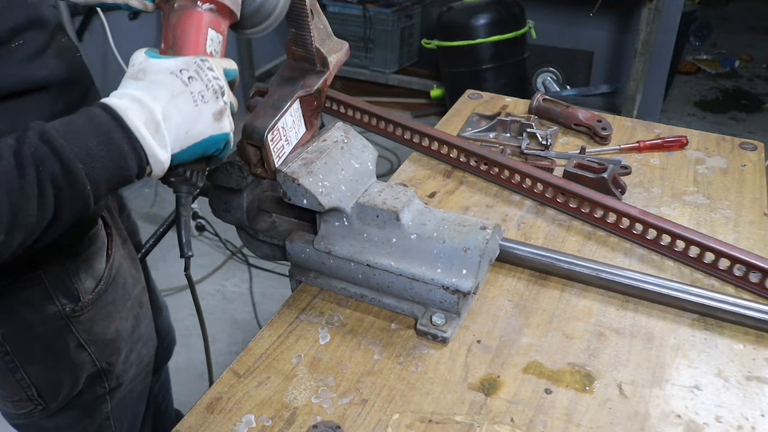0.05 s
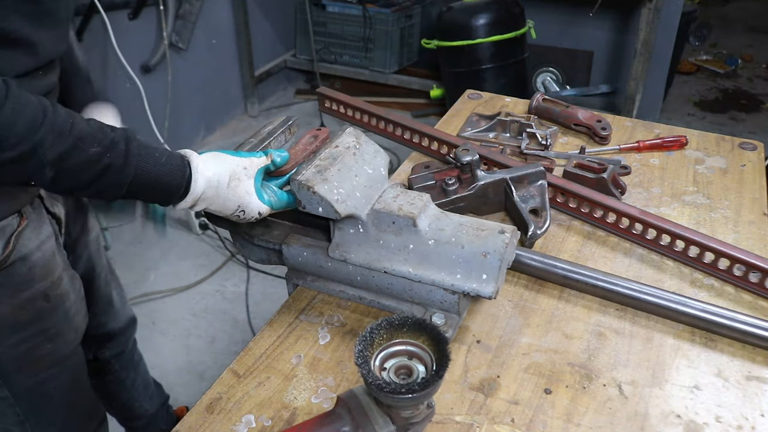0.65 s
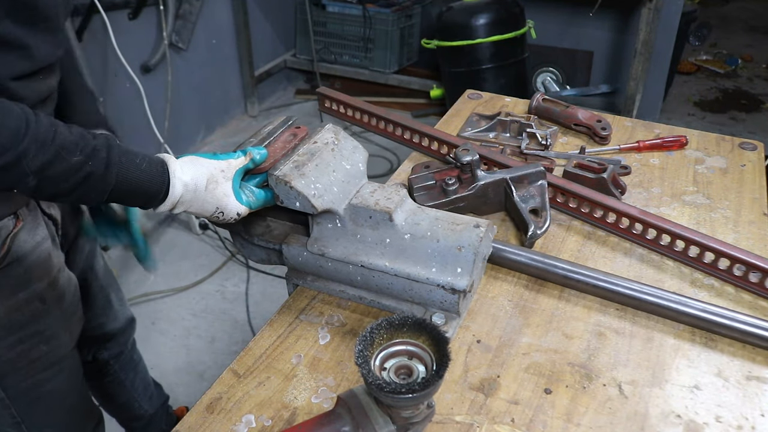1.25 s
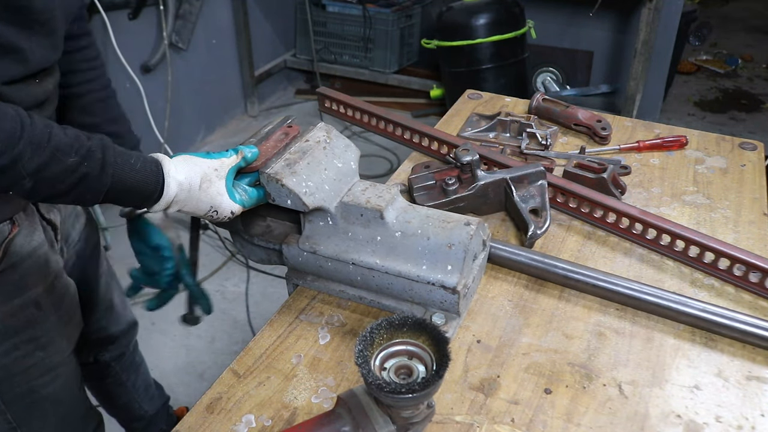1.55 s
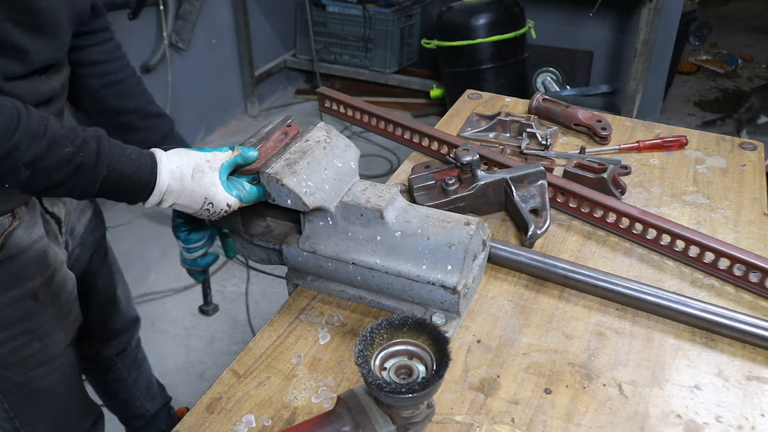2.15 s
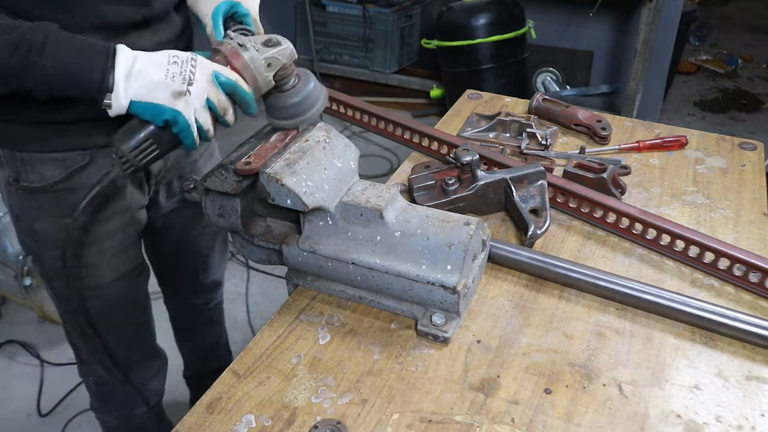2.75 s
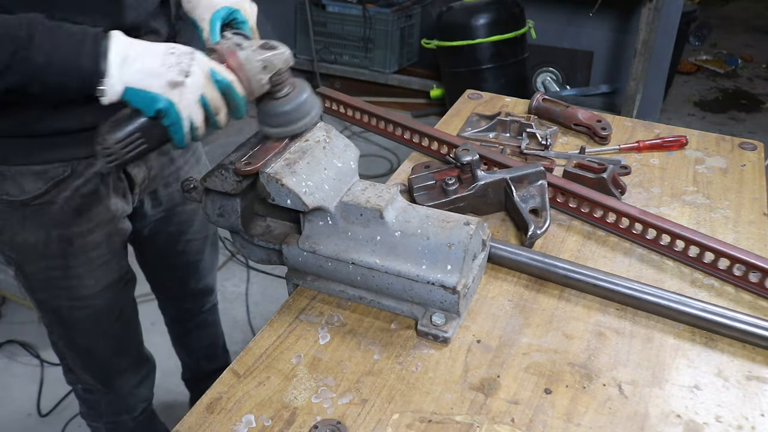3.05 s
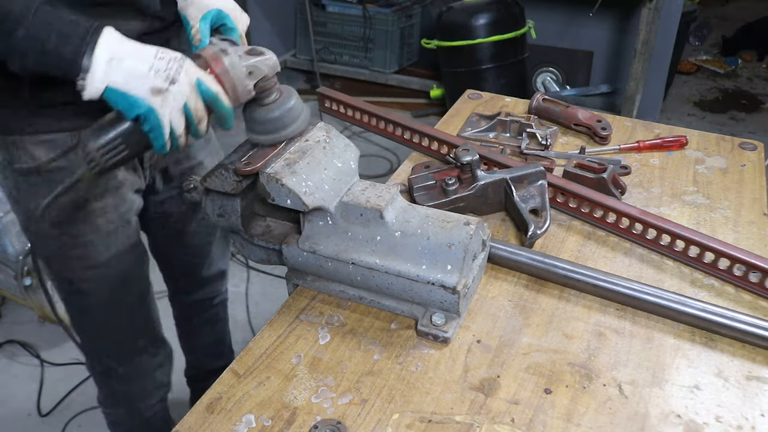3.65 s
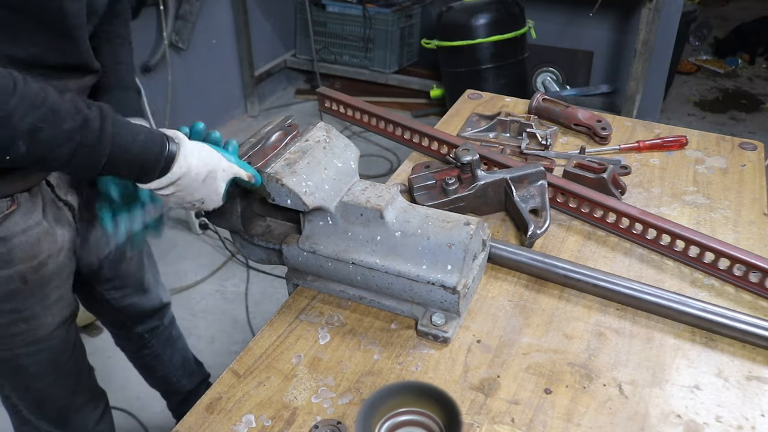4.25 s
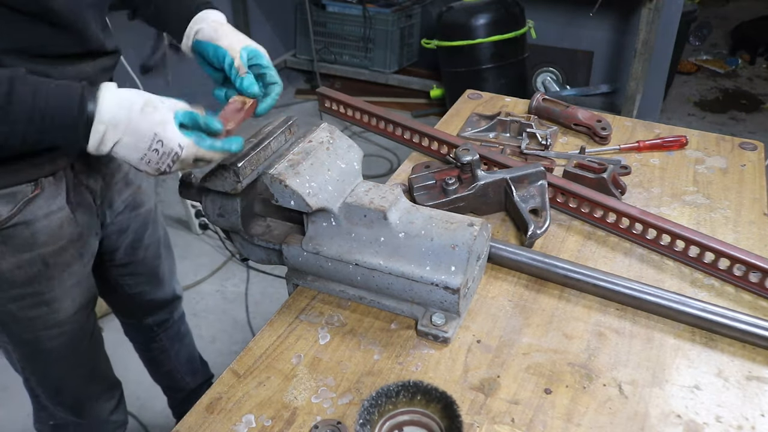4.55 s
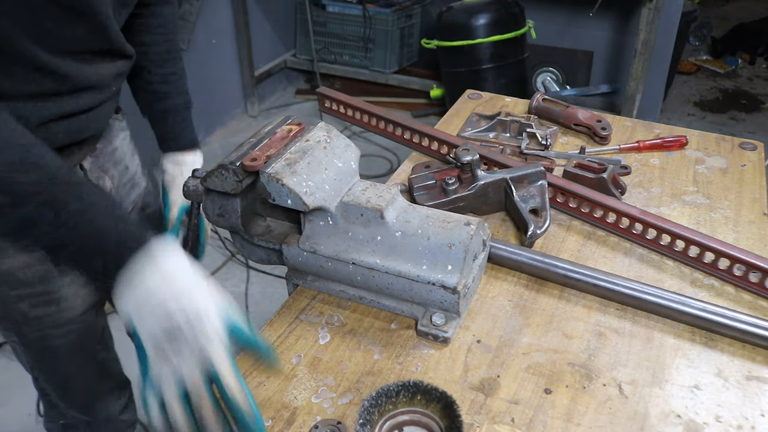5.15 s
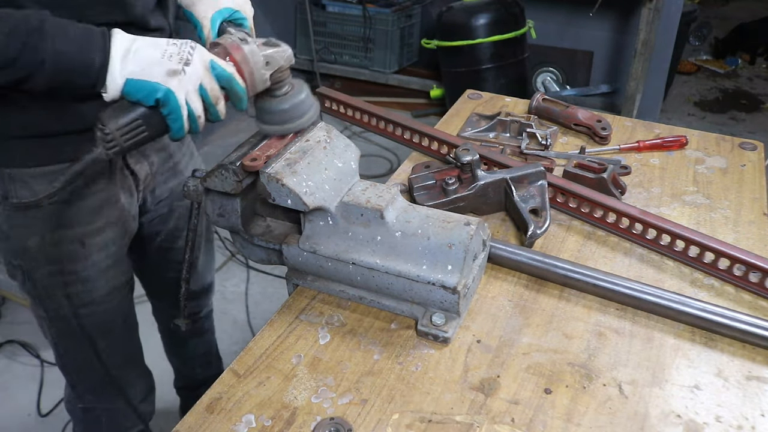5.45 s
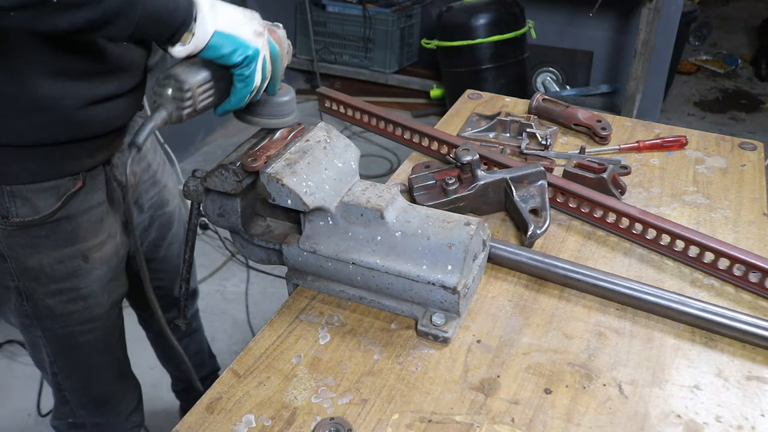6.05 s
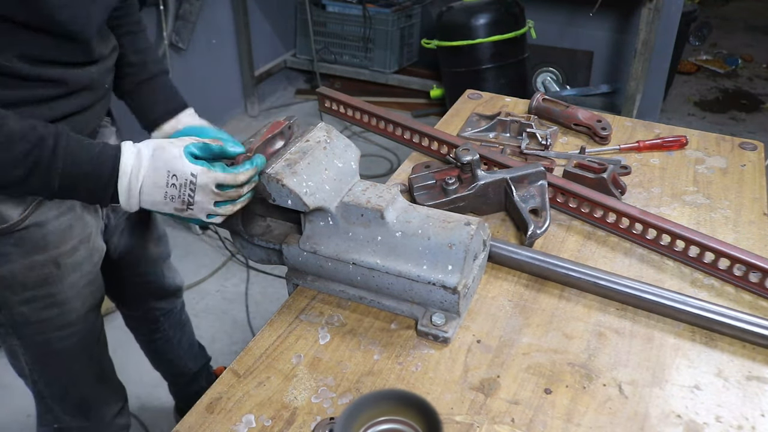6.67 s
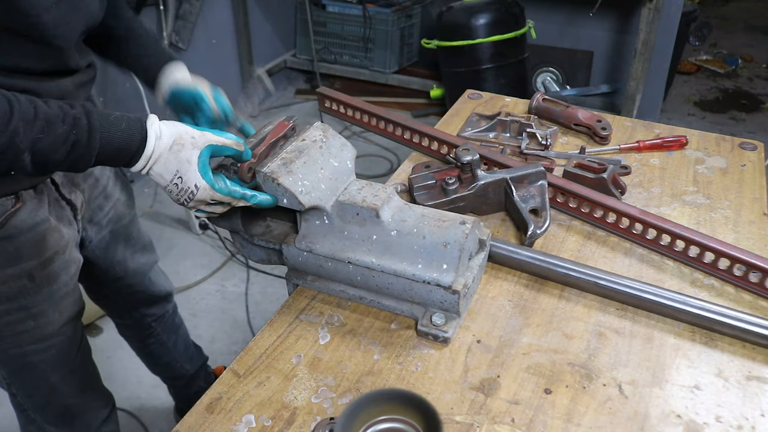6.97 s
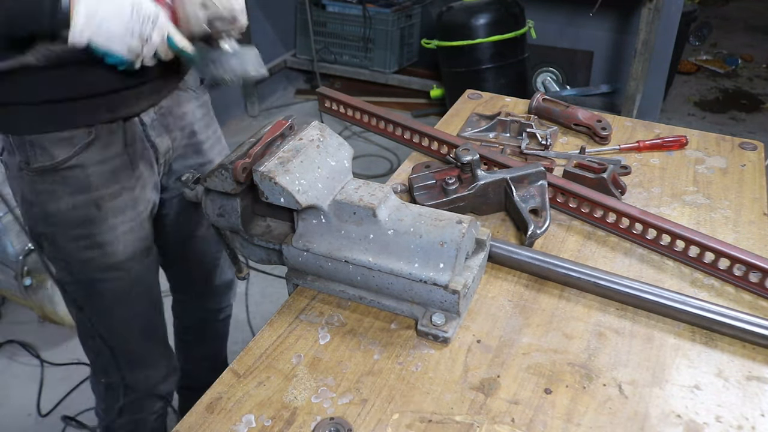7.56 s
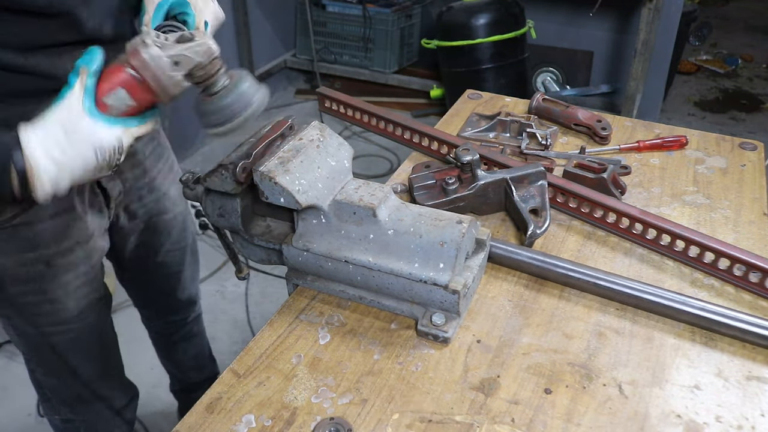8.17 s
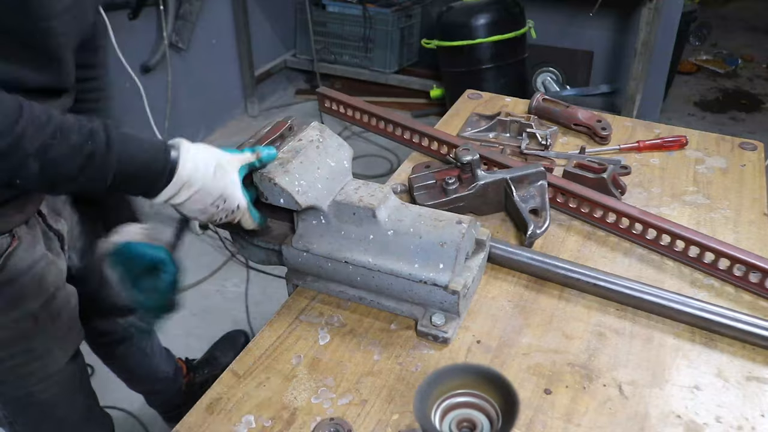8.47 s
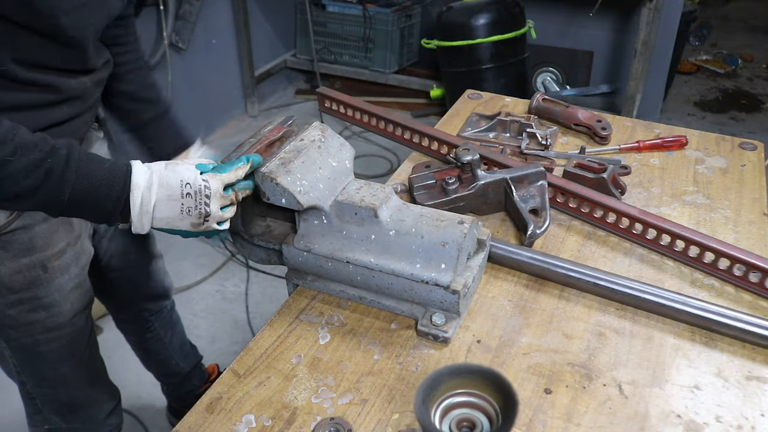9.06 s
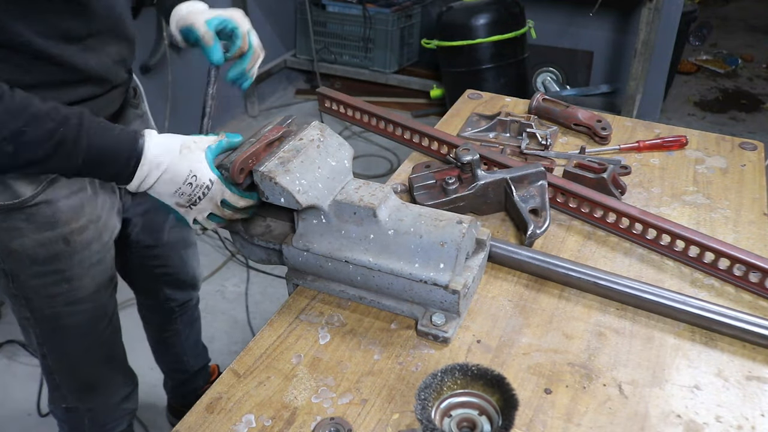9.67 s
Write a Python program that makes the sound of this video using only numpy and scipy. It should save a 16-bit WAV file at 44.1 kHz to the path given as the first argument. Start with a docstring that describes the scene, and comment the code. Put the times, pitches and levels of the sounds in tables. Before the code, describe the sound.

An angle grinder's wire brush scours steel in short whining bursts, rattling down on a wooden bench between metal clinks.

```python
"""An angle grinder with a wire cup brush scours rusty steel in a vise, in four short bursts. Hum, gear whine,
wire hiss and commutator sparking follow the motor speed. The first burst is already under way and its sound
stops abruptly at 0.18 s; after the others the tool coasts on the wooden bench and rattles the top until it
stops. In between, gloved hands work the vise, turn the part and drag the grinder up again. Small workshop."""
import sys
import numpy as np
from scipy import signal
from scipy.fft import rfft, irfft
from scipy.io import wavfile
from scipy.ndimage import uniform_filter1d

SR = 44100
rng = np.random.default_rng(int(sys.argv[2]) if len(sys.argv) > 2 else 0)


def dump(signal):
    """Clip the signal to [-1, 1] and save it as 16-bit WAV at the path in sys.argv[1]."""
    limited = np.clip(np.atleast_2d(signal).T, -1, 1)
    pcm = np.round(limited * 32767).astype(np.int16)
    wavfile.write(sys.argv[1], SR, pcm)


N = 432621
TIME = np.arange(N) / SR
TOP_HZ = 15750
FIRST_ENDS_S = 0.182

# Bursts 2-4. Each row: switch-on in s, laid on the bench in s, standstill in s, bearing friction in Hz/s.
BURSTS = [(2.665, 3.884, 4.535, 358), (5.354, 6.38, 7.2, 366), (7.685, 8.422, 9.176, 400)]
# Brush load, one list per burst. Each row: time in s, motor speed in Hz, whine in dB, hiss in dB.
LOAD_CURVES = [
    [(0, 562, -48, -34.5), (.04, 496, -56, -34.5), (.12, 556, -52, -32.5), (.18, 532, -56, -35.5)],
    [(2.74, 525, -47.5, -35), (2.86, 490, -49.5, -37), (3.05, 524, -58, -34), (3.26, 574, -59, -35.5),
     (3.42, 512, -67, -36), (3.56, 558, -74, -33), (3.62, 492.3, -56, -35), (3.72, 330.3, -50, -33.5)],
    [(5.45, 551, -54, -33.5), (5.53, 569, -52, -37), (5.75, 574, -68, -36.5), (5.87, 594, -55, -36),
     (6.11, 604, -57, -35), (6.2, 507.3, -51, -37)],
    [(7.8, 550, -67, -33.5), (7.9, 558, -68, -36), (7.98, 524, -59, -35.5), (8.1, 555, -51.5, -37.5),
     (8.18, 566.4, -51.5, -38)],
]
# Broad responses of bench and vise. Each row: frequency in Hz, level in dB.
BENCH_SPECTRUM = [(50, -72), (110, -76), (250, -36.5), (380, -53.5), (470, -23.5), (750, -25),
                  (1100, -14.5), (1850, -11.5), (2600, -9.5), (3800, -13.5), (4600, -13), (7000, -16.5),
                  (10000, -34), (16000, -22.5)]
VISE_SPECTRUM = [(50, -43), (110, -34), (220, -17.5), (370, -22.5), (520, -8), (700, -14.5), (1100, -1),
                 (1700, -5), (5000, -12.5), (6200, -19.5), (9000, -28.5), (16000, -51)]
# Their resonances. Each row: frequency in Hz, width in Hz, level in dB.
BENCH_MODES = [(925, 18, -2.5), (1256, 75, -6.5), (1429, 79, 1), (1620, 110, -1.5), (1704, 33, -2),
               (1820, 28, -4), (1983, 37, 7), (2116, 30, 5.5), (2178, 69, 6.5), (2278, 45, 2.5),
               (2393, 27, 3), (2852, 64, 7), (2740, 41, -6), (3135, 49, 1), (3348, 69, 5.5),
               (3560, 220, -4), (3975, 55, -1)]
VISE_MODES = [(456, 29, 1), (761, 13, 7), (935, 19, 9), (1020, 42, 3), (1225, 93, 7), (1420, 25, 6),
              (1990, 28, 6), (2184, 105, 6.5), (1570, 27, -4), (560, 57, -9.5), (2860, 120, 1.5),
              (3580, 320, -5), (3850, 66, -24), (4480, 560, -9), (10700, 350, -21.5), (13400, 640, -31)]


def undb(db):
    """Decibels to gain."""
    return 10 ** (np.asarray(db) / 20)


def unit(x):
    """Scale to rms 1."""
    return x / np.sqrt(np.mean(x ** 2) + 1e-20)


def butter(x, hz, kind="low", order=2):
    """Butterworth filter."""
    return signal.sosfilt(signal.butter(order, hz, kind, fs=SR, output="sos"), x)


def walk(hz):
    """Random drift of rms 1, up to the given rate."""
    return unit(butter(rng.standard_normal(N), hz))


def through(x, impulse):
    """Convolve, keeping the length."""
    return signal.oaconvolve(x, impulse)[:len(x)]


def resonate(x, spectrum, modes=()):
    """Minimum-phase filter: a broad spectrum with resonances on top."""
    hz = np.maximum(np.fft.rfftfreq(4096, 1 / SR), 1)
    points_hz, points_db = np.transpose(spectrum)
    power = undb(np.interp(np.log(hz), np.log(points_hz), points_db)) ** 2
    for centre_hz, width_hz, db in modes:
        power += undb(db) ** 2 / (1 + 2 * ((hz - centre_hz) / width_hz) ** 2) ** 2
    cepstrum = irfft(np.log(power) / 2)
    cepstrum[1:len(hz) - 1] *= 2
    cepstrum[len(hz):] = 0
    return through(x, irfft(np.exp(rfft(cepstrum))))


def grains(per_s, spread_db):
    """Random tiny impacts of uneven size."""
    size = undb(spread_db * np.minimum(rng.exponential(size=N), 4))
    return unit((rng.random(N) < per_s / SR) * size * rng.standard_normal(N))


def gate(start_s, end_s, attack_s, release_s):
    """Trapezoid envelope, zero again at end_s."""
    return np.clip(np.minimum((TIME - start_s) / attack_s, (end_s - TIME) / release_s), 0, 1)


def strokes(rows, attack_s, release_s):
    """Envelope of hand movements: each swells, holds and eases off."""
    return sum(undb(db) * gate(s, s + length_s, attack_s, release_s) for s, length_s, db in rows)


def blows(rows, spectrum, modes, crack_s, scrape_s, trim_db, rebound_db=-9, rebound_s=0.01, detune=0.005):
    """Crack, gritty scrape and rebound; the place of contact sets brightness and which modes ring."""
    count, head, scatter_db = 5000, 530, 2.5
    t = np.arange(count) / SR
    out = np.zeros(N + count)
    for s, level_db, db_per_octave, share in rows:
        noise, grit, pull, place = rng.standard_normal((4, count))
        crack = unit((np.tanh(noise) + 2 * (t == 0)) * np.exp(-t / crack_s))
        build = 1 - np.exp(-t / (1e-5 + 0.0057 * (1 - share) ** 4))  # slower without a hard crack
        again_s = t - rebound_s * (0.5 + rng.random())
        rebound = undb(rebound_db) * (again_s > 0) * np.exp(-np.abs(again_s) / scrape_s)
        scrape = unit(grit * np.abs(noise) * (build * np.exp(-t / scrape_s) + rebound))
        tilt_db = lambda hz: db_per_octave * np.log2(max(hz, 700))
        body = [(hz, db + tilt_db(hz)) for hz, db in spectrum]
        struck = [(hz * (1 + detune * a), width_hz, db + tilt_db(hz) + scatter_db * b)
                  for (hz, width_hz, db), a, b in zip(modes, pull, place)]
        ring = resonate(np.sqrt(share) * crack + np.sqrt(1 - share) * scrape, body, struck)
        start = int(s * SR)
        out[start:start + count] += ring * undb(level_db + trim_db) / np.std(ring[:head])
    return out[:N]


def stick_slip(rows, trim_db, rough, sag, overtone_db):
    """Brief rough tones that swell and die; sag lowers the pitch as they go."""
    out, unrest = np.zeros(N), 1 + rough * walk(400)
    for s, db, hz, rise_s in rows:
        part = slice(int(s * SR), int(s * SR) + SR // 10)
        age = np.maximum(TIME[part] - s, 0) / rise_s
        phase = 2 * np.pi * np.cumsum(hz * unrest[part] * np.exp(-sag * (age - 1))) / SR
        tone = sum(undb(overtone_db * (k - 1)) * np.sin(k * phase)
                   for k in (1, 2, 3) if k * hz < TOP_HZ / 2 or k == 1)
        out[part] += undb(db + trim_db) * (age * np.exp(1 - age)) ** 2 * tone
    return out


def shimmer(rows, modes, flare_db, flare_hz, base_db):
    """Sliding steel: fine slips keep a few modes ringing, each flaring on its own."""
    base = [(200, base_db - 32), (2000, base_db), (16000, base_db - 9)]
    ring = sum(resonate(grains(6000, 1.0) * undb(flare_db * walk(flare_hz)), base, [mode])
               for mode in modes)
    return unit(ring) * strokes(rows, attack_s=0.0074, release_s=0.02)


def room_tone():
    """Faint steady noise."""
    # Each row: frequency in Hz, level in dB.
    spectrum = [(30, -22), (140, -9.5), (400, -5.5), (950, 11.5), (2000, 2), (6000, 3.5), (16000, -1.5)]
    return undb(-64.5) * unit(resonate(rng.standard_normal(N), spectrum))


def workshop(x, t60_s, wet_db, damp_hz):
    """Add dense, dull reflections from the bench top and cluttered walls."""
    t = np.arange(SR // 2) / SR
    tail = rng.standard_normal(len(t)) * np.exp(-np.log(1000) * t / t60_s) * (t > 0.004)
    tail = butter(tail, damp_hz, order=1)
    return x + undb(wet_db) * through(x, tail / np.linalg.norm(tail))


def cloth_rustle():
    """Gloves and sleeves brush past."""
    # Each row: start in s, length in s, level in dB.
    moves = [(0.2, 0.69, -62.5), (0.98, 0.57, -67), (1.7, 0.93, -68), (2.3, 0.46, -65),
             (2.612, 0.047, -42.5), (4.7, 0.29, -54), (5.25, 0.14, -55.5), (7.38, 0.3, -58),
             (9.2, 0.26, -61.5), (9.62, 0.16, -42)]
    # Each row: frequency in Hz, level in dB.
    spectrum = [(40, -44), (200, -30), (1500, -13), (4000, -7), (8000, -3), (11000, -10), (16000, -9)]
    friction = grains(per_s=6000, spread_db=1.0) * undb(4.7 * walk(33))
    return unit(resonate(friction, spectrum)) * strokes(moves, attack_s=0.0029, release_s=0.034)


def steel_rubs():
    """Dry steel sticks and slips, ringing now one set of vise modes, now the other."""
    # Screw turns, part shifts and tool drags. Each row: start in s, length in s, level in dB.
    moves = [(0.2, 0.18, -52), (0.32, 0.496, -47.5), (0.78, 0.17, -51), (0.955, 0.35, -55.5),
             (1.25, 0.393, -57), (1.69, 0.087, -44), (1.76, 0.4, -59.5), (2.1, 0.24, -54.5),
             (2.3, 0.23, -60), (2.44, 0.21, -61.5), (4.68, 0.33, -53.5), (5.02, 0.18, -56.5),
             (5.195, 0.039, -40), (7.32, 0.11, -56.5), (7.385, 0.24, -41.5), (9.19, 0.3, -55),
             (9.48, 0.2, -54.5), (9.615, 0.22, -46)]
    catching = undb(2.4 * walk(32))
    ring = 0
    for modes in (VISE_MODES[::2], VISE_MODES[1::2]):
        slips = grains(per_s=2000, spread_db=2.8) * catching * undb(3.5 * walk(18.4))
        ring += resonate(slips, VISE_SPECTRUM, modes)
    return unit(ring) * strokes(moves, attack_s=0.0079, release_s=0.071)


def steel_squeaks():
    """Dry steel slips with a short squeak."""
    # Each row: start in s, level in dB, pitch in Hz, rise in s.
    slips = [(0.329, -21, 3730, 0.0015), (0.559, -30.5, 4740, 0.0023), (0.683, -31, 4750, 0.002),
             (0.7305, -26, 5000, 0.0016), (0.759, -46, 1250, 0.0029), (1.752, -35, 6300, 0.0043),
             (4.7122, -19.5, 2324, 0.0021), (4.807, -26, 1600, 0.0045), (7.398, -28, 1300, 0.0043),
             (7.606, -46, 1350, 0.013), (9.767, -35, 3950, 0.0031), (9.784, -30, 3920, .0025)]
    return stick_slip(slips, trim_db=-4, rough=0.052, sag=0.025, overtone_db=-10.5)


def screw_thread():
    """The thread shimmers as the vise screw is wound in."""
    # Each row: start in s, length in s, level in dB.
    turns = [(0.24, 0.62, -53), (0.96, 0.62, -59)]
    # Each row: frequency in Hz, width in Hz, level in dB.
    modes = [(3430, 210, 4.5), (3850, 87, 5), (4250, 79, -5), (4660, 200, 2.5), (5250, 120, -3),
             (10760, 490, -12), (13400, 300, -6), (13900, 600, -17)]
    return shimmer(turns, modes, flare_db=7, flare_hz=35, base_db=-32)


def vise_clinks():
    """Handle and part clink; being loose, they shift pitch from blow to blow."""
    # Each row: start in s, level in dB, tilt in dB/octave, crack share 0-1.
    hits = [(0.279, -42.5, 6, 0.2), (0.327, -33, 4, 0.76), (0.372, -49, 0.5, 0.1), (0.447, -34.5, 3.5, 0.8),
            (0.514, -40.5, 1, 0.25), (0.561, -44, 0, 0.3), (0.587, -41.5, 2, 0.7), (0.638, -31, 1, 0.84),
            (0.706, -38, 0, 0.4), (0.733, -39, 5, 0.7), (0.765, -38, .5, 0.5), (0.845, -40.5, 4.5, 0.45),
            (0.957, -46.5, 3.5, 0.7), (1.026, -45, 1.5, 0.1), (1.115, -45.5, 9, 0.2),
            (1.6825, -28.5, 4.5, 0.6), (1.855, -42.5, 6, 0.4), (1.902, -35.5, 1, 0.23),
            (1.943, -32.5, 6, 0.05), (2.102, -37.5, 2, 0.15), (2.139, -44, 0, 0), (2.177, -46, 3.5, 0),
            (2.24, -46, 0, 0.03), (2.254, -51, 5, 0.2), (2.362, -48, -4, 0), (4.715, -48, 3, 0.9),
            (4.812, -35.5, 6.5, 0.07), (5.085, -42, 1, 1), (5.115, -46, 2, 0.04), (7.221, -46, 2.5, 0.8),
            (9.267, -38.5, 3, 0), (9.377, -42, 1.5, 0.6), (9.535, -42, 3, 0.2), (9.785, -39, 8, 0.2),
            (9.8055, -33.5, 6.5, .5)]
    return blows(hits, VISE_SPECTRUM, VISE_MODES, crack_s=0.0047, scrape_s=0.0084, trim_db=-3,
                 rebound_db=-22.5, rebound_s=0.014, detune=0.028)


def vise_pings(rise_s=0.00077):
    """Handle and part ring on one note when tapped."""
    # Each row: start in s, level in dB, pitch in Hz, decay in s.
    taps = [(1.904, -42, 2190, 0.0053), (1.946, -33, 5350, 0.0062), (2.104, -43, 935, 0.026),
            (2.243, -39.5, 1103, 0.014), (4.716, -52, 3450, 0.0077), (4.813, -41, 5040, 0.018),
            (5.114, -42.5, 1213, 0.028)]
    out, t = np.zeros(N), np.arange(SR // 5) / SR
    for s, db, hz, decay_s in taps:
        start = int(s * SR)
        envelope = np.exp(-t / decay_s) - np.exp(-t / rise_s)
        out[start:start + len(t)] += undb(db) * envelope * np.sin(2 * np.pi * hz * t)
    return out


def rim_drags():
    """The cup's rim drags over the bench as the tool is picked up."""
    # Each row: start in s, length in s, level in dB.
    drags = [(7.39, 0.193, -43.5), (9.628, 0.063, -34)]
    # Each row: frequency in Hz, width in Hz, level in dB.
    modes = [(1280, 110, 3), (2200, 200, 5), (5850, 90, 4), (7940, 140, 5), (10200, 390, 4.5),
             (12100, 170, 4), (15100, 300, -6)]
    return shimmer(drags, modes, flare_db=1, flare_hz=60, base_db=-19)


def tool_knocks():
    """Grinder and brush knock and ring as they are moved."""
    # Each row: start in s, level in dB, tilt in dB/octave, crack share 0-1.
    hits = [(2.449, -39, 9, 0.2), (2.458, -37, -6, 0.12), (2.505, -39, 0, 0.1), (2.511, -40.5, -8, 0.46),
            (2.565, -49, -0.5, 0), (3.836, -28.5, -1.5, 0.62), (3.867, -32.5, -2.5, .7),
            (4.632, -43, 3, 0.33), (4.673, -41, 1, 0.4), (4.951, -38.5, 4, 0.44), (5.212, -28.5, 0.5, 0.32),
            (5.225, -35, -1, 0.8), (5.231, -38, 2, 0.5), (5.237, -29, -1.5, 0.94),
            (7.3965, -28.5, 11.5, 0.5), (7.421, -32, 9, 0.5), (7.443, -31, 10, 0.65),
            (7.467, -35, -5.5, 0.18), (7.475, -25, 14, 0.5), (7.499, -48, 10, 0.5), (7.519, -38, 8, .3),
            (7.527, -26.5, 8, 0.23), (7.5345, -27.5, 2.5, 0.33), (9.666, -35, -1.5, 0.4),
            (9.676, -42, 4, 0.4), (9.726, -25, 0.5, 0.26), (9.737, -35.5, 0, 0.16)]
    # Each row: frequency in Hz, level in dB.
    spectrum = [(40, -23), (120, -41), (220, -29), (350, -28), (600, -7), (1100, 4), (1700, 1.5), (3200, 7),
                (8000, -2), (14000, -10), (16000, -13)]
    # Each row: frequency in Hz, width in Hz, level in dB.
    modes = [(230, 33, -13), (566, 48, -6.5), (938, 23, 12.5), (1250, 93, -2), (2210, 50, 8.5),
             (2310, 60, 10), (2900, 73, 5), (3400, 70, 9), (5780, 44, 8.5), (6050, 120, -0.5),
             (7070, 65, 10.5), (7530, 31, 7.5), (10240, 590, -4), (11560, 140, -2)]
    return blows(hits, spectrum, modes, crack_s=0.00046, scrape_s=0.0052, trim_db=-2)


def bench_landings():
    """The coasting grinder lands and hops on the wooden top."""
    # Each row: start in s, level in dB, tilt in dB/octave, crack share 0-1.
    hits = [(3.836, -25.5, -7, 0.3), (3.867, -30.5, -4, 0.9), (4.016, -38.5, -7, 1), (4.25, -48, -9, 1),
            (4.329, -27, 2, 0.58), (6.38, -38, -12.5, 0.8), (6.452, -31, -3, .2), (8.413, -28, -4, 0.2)]
    return blows(hits, BENCH_SPECTRUM, BENCH_MODES, crack_s=0.00061, scrape_s=0.0049, trim_db=-1.5,
                 rebound_db=-7)


def thumps(decay_s=0.00041):
    """The hardest jolts carry a dull, one-sided push."""
    # Each row: start in s, peak in dB.
    jolts = [(2.667, -45), (3.836, -41), (4.328, -46), (9.726, -42)]
    return sum(undb(db) * (TIME >= s) * np.exp(-np.abs(TIME - s) / decay_s) for s, db in jolts)


def grip_bumps():
    """Soft bumps as the grip on the housing shifts."""
    # Each row: start in s, level in dB, tilt in dB/octave, crack share 0-1.
    hits = [(3.714, -52, -5, 0.21), (3.738, -50, 3.5, 0)]
    return blows(hits, VISE_SPECTRUM, VISE_MODES, crack_s=0.001, scrape_s=0.011, trim_db=2)


def switch_snaps():
    """The switch snaps on and rings the housing."""
    # Each row: start in s, level in dB, tilt in dB/octave, crack share 0-1.
    hits = [(2.666, -30.5, -3.5, 0.72), (5.356, -33, -2, 0.3), (7.686, -30.5, -2.5, 0.37)]
    # Each row: frequency in Hz, level in dB.
    spectrum = [(40, -49), (400, -23), (1200, -31), (2200, -19), (5000, 9), (10000, 11), (16000, -16)]
    # Each row: frequency in Hz, width in Hz, level in dB.
    modes = [(1530, 56, -3), (2380, 106, 9), (3450, 180, -7)]
    return blows(hits, spectrum, modes, crack_s=0.0013, scrape_s=0.013, trim_db=0.5)


def cup_singing():
    """The cup sings for a moment as it catches an edge."""
    # Each row: start in s, level in dB, pitch in Hz, rise in s.
    catches = [(5.866, -39, 9200, 0.02), (8.063, -41, 6420, 0.0048), (8.149, -38, 6430, 0.0069)]
    return stick_slip(catches, trim_db=4, rough=0.0054, sag=0, overtone_db=-20)


def load_curve(name):
    """One column of LOAD_CURVES over time; its last value holds until the next switch-on."""
    column = ("time_s", "speed_hz", "whine_db", "hiss_db").index(name)
    burst = np.searchsorted([row[0] for row in BURSTS], TIME)
    curves = [np.interp(TIME, rows[:, 0], rows[:, column]) for rows in map(np.array, LOAD_CURVES)]
    return np.choose(burst, curves)


def motor_speed(spin_up_s=0.024, air_drag=0.00211):
    """Speed in Hz: spin-up, work under load, then a coast against friction and square-law air drag."""
    loaded_hz = load_curve("speed_hz")
    speed_hz = loaded_hz * (TIME < FIRST_ENDS_S)
    for (on_s, _, stop_s, friction), rows in zip(BURSTS, LOAD_CURVES[1:]):
        spin_up = 1 - np.exp(-np.maximum(TIME - on_s, 0) / spin_up_s)
        remaining = np.clip(np.sqrt(friction * air_drag) * (stop_s - TIME), 0, 1.5)
        coast_hz = np.minimum(loaded_hz, np.sqrt(friction / air_drag) * np.tan(remaining))
        speed_hz += np.where(TIME < rows[-1][0], loaded_hz * spin_up, coast_hz)
    return speed_hz


def rasp(angle, order, steps_per_turn):
    """Rough band on a multiple of the motor speed; it narrows as it falls."""
    step = angle / (2 * np.pi) * steps_per_turn
    size = np.interp(step, np.arange(N), rng.standard_normal(N))
    below_nyquist = order * np.gradient(angle) < 0.9 * np.pi
    return 1.7 * size * np.cos(order * angle) * below_nyquist


def commutator_squeal(speed_hz, angle, loudest_hz=2500, level_db=-42):
    """A thin, uneven tone with two side lines falls with the commutator's last turns."""
    # Each row: multiple of motor speed, level in dB.
    lines = [(63, -6), (70, 0), (80, -10)]
    out = 0
    for order, db in lines:
        octaves = np.log2((order * speed_hz + 1) / loudest_hz)
        gain = undb(level_db + db + 3 * walk(60)) / (1 + octaves ** 4)
        out += gain * np.sin(order * angle + 0.7 * walk(110))
    return out


def bench_rattle(angle, mesh, slow, hollow_hz=1700):
    """The housing chatters on the wood; modes flare as gear and commutator lines fall through them."""
    gear_lines = np.sin(2 * mesh) * walk(56) + np.sin(9 * angle) * walk(56)
    drive = undb(-16) * gear_lines + undb(-11) * slow * rasp(angle, order=70, steps_per_turn=14)
    rocking = (1 + 0.045 * np.sin(angle / 4)) * undb(walk(49))
    shake = 0
    for modes in (BENCH_MODES[::2], BENCH_MODES[1::2]):
        force = (grains(per_s=5000, spread_db=0.69) + drive) * rocking
        creep = undb(walk(8))  # the creeping tool favours each set of modes in turn
        shake += resonate(force * creep, BENCH_SPECTRUM, modes)
    body = signal.sosfiltfilt(signal.butter(2, hollow_hz, fs=SR, output="sos"), shake)
    shake -= 0.43 * slow * body  # hollow on the last turns
    running_rms = np.sqrt(uniform_filter1d(shake ** 2, size=1800) + 1e-12)
    return shake / running_rms


def motor_hum(angle, pace, resting, order=1.96, level_db=-62.5, bench_db=16.5):
    """Hum near twice the motor speed, louder through the bench top."""
    tone = np.sin(order * angle) + undb(-4) * walk(45) * np.sin(2 * order * angle)
    return tone * pace ** 3.44 * undb(level_db + bench_db * resting + 1.4 * walk(40))


def gear_whine(speed_hz, angle, mesh, resting, delay_s=0.021, full_hz=367, gearbox_hz=5700):
    """The mesh tone follows the load; on the bench the top acts as its sounding board."""
    # Each row: frequency in Hz, width in octaves, level in dB.
    board_peaks = [(1300, 0.44, -39), (2223, 0.09, -35)]
    mesh_hz = 7 * speed_hz
    uneven_teeth = sum(np.sin(k * angle) * undb(3 * walk(30)) for k in (4, 5, 6, 9))
    gearbox = 1 / (1 + ((2 * mesh_hz - gearbox_hz) / 1100) ** 2)
    overtone = undb(-2 + 3 * walk(70)) * np.sin(2 * mesh) * gearbox * (1 - 0.46 * resting)
    tone = np.sin(mesh) + overtone + undb(-23) * uneven_teeth
    flutter = undb(1.15 * walk(94) + 0.6 * walk(50))
    meshed = sum(gate(on_s + delay_s, stop_s, 0.053, 0.01) for on_s, _, stop_s, _ in BURSTS)
    meshed += TIME < FIRST_ENDS_S
    held = undb(load_curve("whine_db")) * np.minimum(speed_hz / full_hz, 1) ** 3 * meshed
    board = sum(undb(db) / (1 + (np.log2((mesh_hz + 1) / hz) / octaves) ** 2)
                for hz, octaves, db in board_peaks)
    return tone * flutter * (held + resting * board * np.minimum(speed_hz / 125, 1) ** 2)


def sparking(angle, flare_db=2.2, patch_db=3):
    """Carbon brushes rasp in ragged bands that swell as they sweep through the housing resonances."""
    # Main bands and fine overtones. Each row: multiple of motor speed, size steps per turn, level in dB.
    main_bands = [(21.04, 5, -10), (25.84, 5, -11), (62.8, 5, -9), (69.4, 4.9, -8), (80, 30, -6.5)]
    fizz_bands = [(141, 18, -14.5), (157, 70, -5.5), (165, 10, -13)]
    # Each row: frequency in Hz, width in Hz, level in dB.
    housing_modes = [(3094.5, 867, 12), (4480, 780, 2), (6722, 1200, 7), (8260, 440, 5), (10100, 420, 0),
                     (13960, 3600, 7.5)]
    shell = [(300, -72), (1500, -13), (16000, -15)]  # Hz, dB
    out = 0
    for rows, modes in ((main_bands, housing_modes), (fizz_bands, housing_modes[-1:])):
        bands = 0
        for order, steps_per_turn, db in rows:
            gain = undb(db + flare_db * walk(70) + patch_db * np.tanh(walk(16)))
            bands += gain * rasp(angle, order, steps_per_turn)
        out += resonate(bands, shell, modes)
    return butter(out, 1100, "high")


def brush_hiss(speed_hz, wire_shake, full_hz=440, wires_db=-43):
    """Wire tips and cooling air hiss, fading as the motor slows; on the bench the shaken wires hiss on."""
    # Each row: frequency in Hz, level in dB.
    spectrum = [(35, -108), (60, -72), (130, -67), (167, -72), (221, -48), (255, -61), (856, -36),
                (1130, -21), (1240, -17.5), (1680, -15), (3470, -7), (5040, -4), (9030, 4.5), (15800, 0.5)]
    # Whistles of the spinning cup. Each row: frequency in Hz, width in Hz, level in dB.
    cup_modes = [(6430, 60, 5), (8370, 97, 4), (8530, 80, -13), (9500, 69, -27)]
    scour = unit(resonate(grains(per_s=22000, spread_db=0.43), spectrum, cup_modes))
    flutter = undb(0.36 * walk(70) + 1.83 * walk(4.6))
    working = undb(load_curve("hiss_db")) * np.minimum(speed_hz / full_hz, 1) ** 2.06
    return scour * flutter * np.hypot(working, undb(wires_db) * wire_shake)


def grinder(working_hz=560, rock_hz=73, stall_hz=30.8, spark_db=-44, rattle_db=-34):
    """One rotor drives every layer; the tool rocks harder on its last turns, then stalls."""
    speed_hz = motor_speed() * (1 + 0.003 * walk(60.25))
    pace = speed_hz / working_hz
    turning = np.minimum(speed_hz / stall_hz, 1) ** 0.94
    resting = sum(gate(laid_s, stop_s, 0.0064, 0.0064) for _, laid_s, stop_s, _ in BURSTS)
    slow = np.exp(-(speed_hz / rock_hz) ** 2)
    rock_gain = undb(6 * slow) * turning
    angle = 2 * np.pi * np.cumsum(speed_hz) / SR
    mesh = 7 * angle + 0.45 * walk(90)  # gear phase with flutter, rad
    tones = motor_hum(angle, pace, resting) + gear_whine(speed_hz, angle, mesh, resting)
    tones = butter(np.sqrt(2) * tones, 340, "high")  # the small housing radiates no bass
    sparks = undb(spark_db) * sparking(angle) * rock_gain * turning ** 0.082
    hiss = brush_hiss(speed_hz, wire_shake=resting * pace ** 0.1 * turning)
    spindle_pulse = 1 + 0.024 * np.sin(angle / 4)
    rattle = undb(rattle_db) * bench_rattle(angle, mesh, slow) * rock_gain
    squeal = commutator_squeal(speed_hz, angle)
    return tones + (hiss + sparks) * spindle_pulse + (rattle + squeal) * resting


def scene():
    """Grinder and handling in the workshop, the same in both channels."""
    impacts = vise_clinks() + tool_knocks() + bench_landings() + grip_bumps() + switch_snaps()
    squeaks, singing = steel_squeaks(), cup_singing()
    sliding = screw_thread() + rim_drags()
    machine = workshop(grinder() + singing, t60_s=0.12, wet_db=-13.5, damp_hz=5000)
    handling = steel_rubs() + cloth_rustle() + sliding + squeaks + impacts + thumps() + vise_pings()
    handling = workshop(handling, t60_s=0.15, wet_db=-14.5, damp_hz=4230)
    return np.tile(machine + handling + room_tone(), (2, 1))


def record(dry):
    """Steep low-pass at TOP_HZ."""
    return signal.sosfilt(signal.ellip(10, 0.2, 70, TOP_HZ, fs=SR, output="sos"), dry)


dry = scene()
out = record(dry)
dump(out)
```